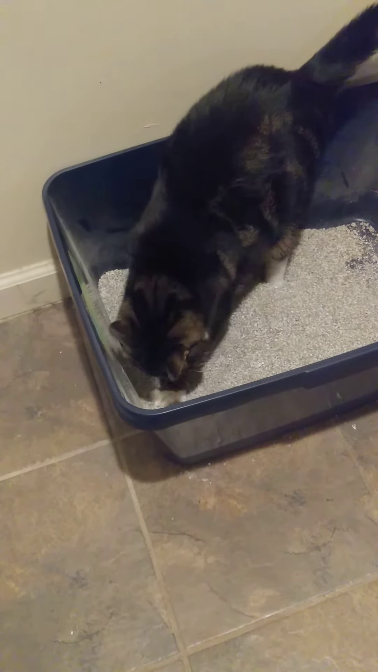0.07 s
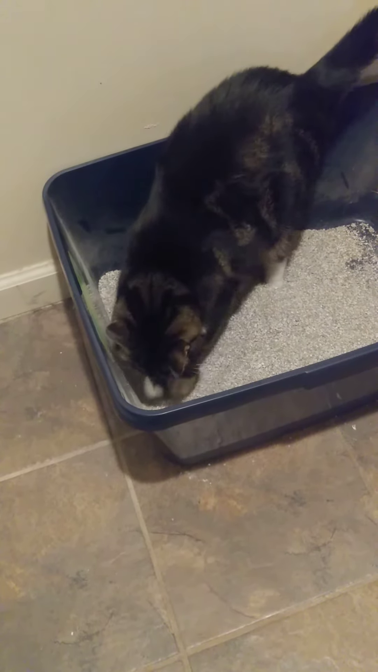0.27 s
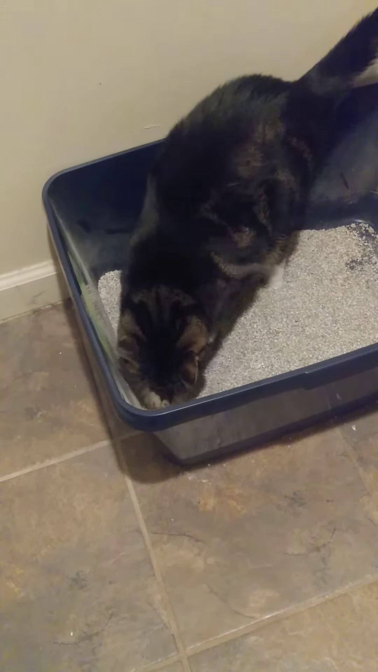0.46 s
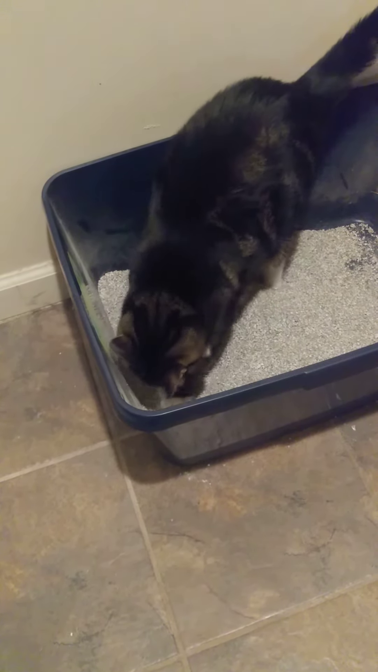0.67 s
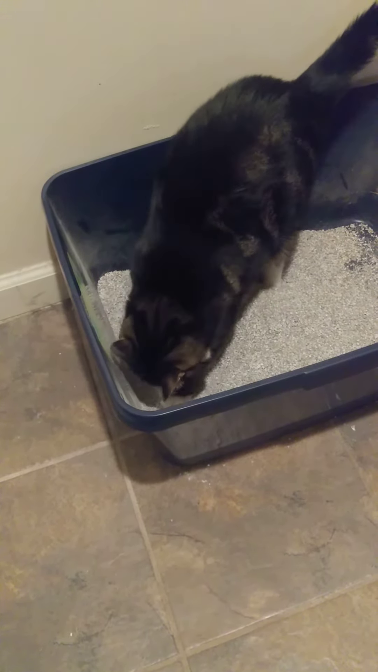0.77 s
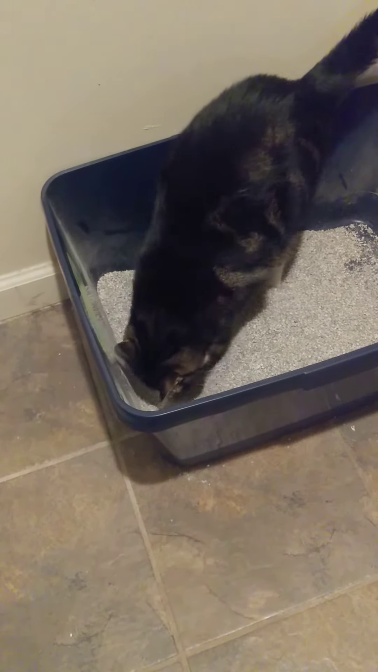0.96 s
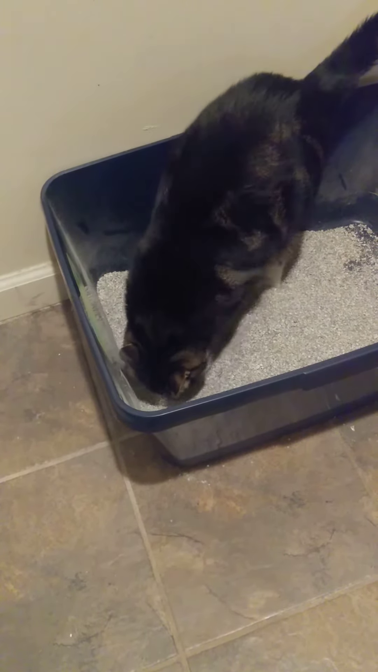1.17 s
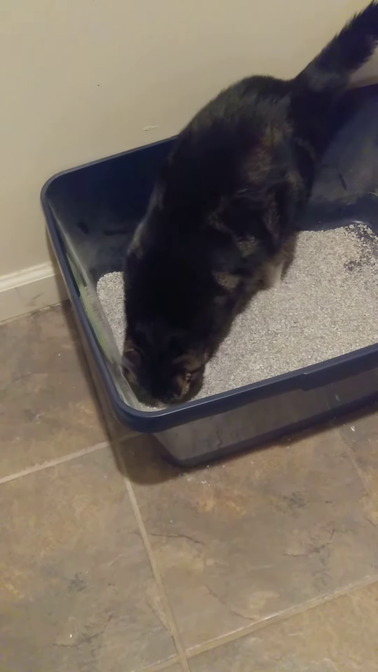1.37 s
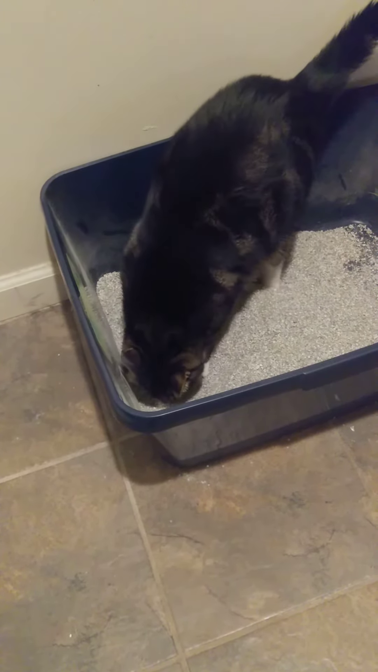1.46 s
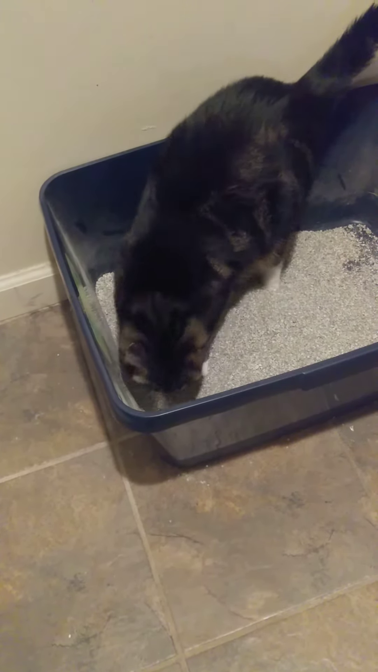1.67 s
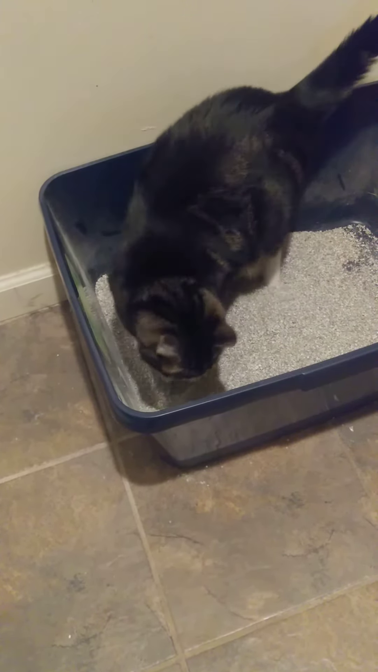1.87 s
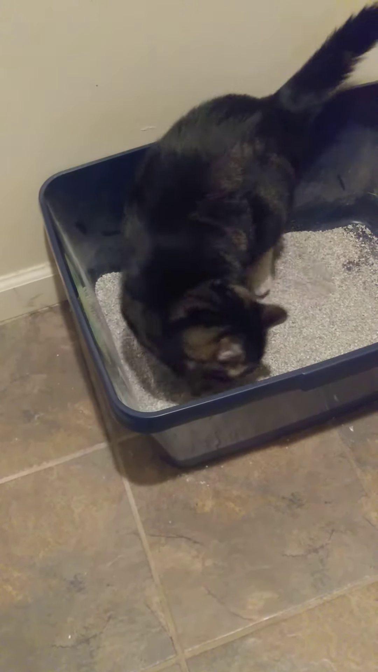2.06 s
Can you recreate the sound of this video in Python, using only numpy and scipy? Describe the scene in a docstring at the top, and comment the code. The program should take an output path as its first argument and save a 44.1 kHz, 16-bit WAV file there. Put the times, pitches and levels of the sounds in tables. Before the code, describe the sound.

Cat paw scraping granular litter in a plastic tub, short raspy scratches over faint fan hum

```python
"""A cat rakes granular litter in a plastic box in a small tiled room, picked up in mono.
Each paw stroke is a dense run of grain slips: filtered noise clicks rumble and rasp through the
resonances of the tub, while a third run of slips goes straight into the air as a hiss of pushed grit.
Soft thuds of the paw, claw taps and single granules ticking on the plastic join in; the hard walls
answer with a noise tail. Behind it a fan hums faintly: wavering tones over a soft rush of air."""
import sys
import numpy as np
from scipy import signal
from scipy.fft import rfft, irfft
from scipy.io import wavfile

SR = 44100
rng = np.random.default_rng(int(sys.argv[2]) if len(sys.argv) > 2 else 0)


def unload_wav(signal):
    """Save mono or channel-first audio to the path in sys.argv[1] as 16-bit WAV at rate SR, clipped to [-1, 1]."""
    wavfile.write(
        sys.argv[1],
        SR,
        np.round(np.clip(np.atleast_2d(signal).T, -1, 1) * 32767).astype(np.int16),
    )


N = 92610   # length in samples
T = np.arange(N) / SR   # time in s

# Paw strokes: start [t/s], rise [t/s], hold [t/s], lag of the grit [t/s], rise of the grit [t/s],
# rumble before the tub [level/dB], rasp before the tub [level/dB], grit hiss [level/dB]
STROKES = [(0.019, 0.046, 0.18, 0.014, 0.026, -52.5, -54.5, -56.5),
           (0.145, .09, 0.018, -.004, 0.1, -34.5, -32.5, -36.5),
           (0.275, .065, 0.0091, -0.02, 0.13, -39.5, -25, -27),
           (0.36, 0.018, 0.0048, -0.021, 0.018, -68, -54, -50),
           (0.512, 0.032, 0.028, -0.0028, 0.029, -42, -46, -46.5),
           (0.6, 0.065, 0.046, -0.0017, 0.084, -39, -31.5, -33.5),
           (0.776, 0.047, 0.016, 0.012, 0.04, -31.5, -32.5, -28.5),
           (0.821, 0.034, 0.027, 0.012, 0.042, -34, -25, -26),
           (1.083, 0.056, 0.014, 0.0089, 0.038, -36, -30.5, -32.5),
           (1.147, 0.037, 0.031, -0.012, 0.041, -66, -44.5, -32),
           (1.217, .01, 0.011, -0.0024, 0.0089, -55, -42, -32.5),
           (1.277, 0.023, 0.052, 0.0017, .025, -69, -56.5, -51),
           (1.791, 0.035, .018, 0.0068, .012, -44.5, -34, -38.5),
           (1.858, 0.027, 0.022, -0.0019, 0.023, -56, -51, -52.5)]
# Spectra of the strokes, shape only: [f/Hz], [relative level/dB]
RUMBLE_SPECTRUM = [(60, -23.5), (140, -25), (200, -4), (330, -3), (430, -11), (650, 0.5), (900, -1),
                   (1400, -8), (3000, -21), (16000, -65)]
RASP_SPECTRUM = [(100, -52), (400, -34), (800, -9.5), (1300, 0), (2200, 1), (2700, -5), (4500, -9.5),
                 (7000, -10), (10000, -21.5), (16000, -30)]
GRIT_SPECTRUM = [(200, -62), (1200, -29), (2600, -5), (3800, 1), (5000, 0), (6200, 0), (7900, -5.5),
                 (9200, 5), (9900, -1.5), (10800, -14.5), (13000, -23.5), (16000, -24)]
# Resonances of the plastic tub: centre [f/Hz], width [f/Hz], level before TUB_DB [level/dB]
TUB_MODES = [(522, 33, 5.5), (642, 47, 1), (683, 35, -3.5), (770.6, 7, 4.5), (830, 24, 0.5), (986, 70, -3),
             (1287, 32, 3), (1396, 18, 4.5), (1557, 44, -6), (1793, 10, -2), (1874, 31, -4.5),
             (2065, 33, -6), (2240, 96, -2.5), (2390, 12, -15), (2810, 160, -1), (3170, 19, 6),
             (3492, 77, 8.5)]
# The paw presses down: start [t/s], hold [t/s], force [level/dB]
THUDS = [(0.617, 0.067, -43), (0.805, 0.073, -41)]
# Spectrum of a thud, shape only: [f/Hz], [relative level/dB]
THUD_SPECTRUM = [(50, -27), (110, -18), (180, -7.5), (260, 2), (350, -0.5), (520, 3), (700, 6), (1200, -23),
                 (16000, -70)]
# A claw taps the wall of the box: start [t/s], force [level/dB]
CLAW_TAPS = [(0.0244, -32.5), (0.028, -32), (0.0519, -35)]
# Spectrum of a claw tap, shape only: [f/Hz], [relative level/dB]
CLAW_SPECTRUM = [(300, -21), (1300, -12.5), (1950, 4.5), (2700, -3), (4000, 1), (4500, -3), (5000, 3),
                 (5600, -9), (7300, -7), (8500, -9), (9400, 6), (10200, -6), (11000, -16), (16000, -22)]
# Single granules hit the plastic: time [t/s], click [level/dB], patter of its neighbours [level/dB]
TICKS = [(0.0128, -31.5, -46), (0.0526, -25, -39), (0.361, -16, -28), (0.607, -25, -35),
         (0.631, -4.5, -25.5), (0.674, -17, -31), (1.2311, -6, -23), (1.296, -16, -44), (1.446, -36, -52),
         (1.4913, -31, -51.5), (1.6413, -36, -51), (1.66, -48, -72), (1.70, -37, -68), (1.74, -38, -58),
         (1.759, -37, -56), (1.8335, -26, -50), (1.9625, -26, -58), (2.035, -40, -52)]
# Spectrum of granules on plastic, shape only: [f/Hz], [relative level/dB]
TICK_SPECTRUM = [(300, -20), (1500, -25), (3300, -11), (4700, -4.5), (6000, 3), (7000, 3), (8100, -4),
                 (9300, 7), (10000, 1.5), (11000, -8), (13000, -15), (16000, -11)]
# Decay of the room: band centre [f/Hz], time to fall by 60 dB [t/s]
ROOM_T60 = [(250, 0.41), (800, 0.36), (2000, 0.37), (4500, 0.45), (9000, 0.28), (15000, 0.42)]
# Hum tones of the fan: [f/Hz], rms about which it wavers [level/dB]
HUM = [(59.3, -75), (166, -73), (237, -47.5), (255, -60.5), (287, -57), (356, -59), (830, -67), (1126, -67)]
# Spectrum of the fan's air, shape only: [f/Hz], [relative level/dB]
FAN_AIR_SPECTRUM = [(25, -47), (40, -39), (60, -25), (110, -21), (170, -8), (280, -2), (370, -3.5),
                    (470, -11), (1000, -16.5), (1500, -21), (2500, -21), (4500, -29), (8000, -31.5),
                    (9400, -28), (11000, -45), (16000, -45)]

RELEASE_S, GRIT_RELEASE_S = 0.018, 0.014   # decay as the paw lifts; decay of the grit
SLIPS_PER_S, SLIP_SPREAD_DB = 9000, 2
JUDDER_DB, JUDDER_PER_S = 1.46, 120   # the paw catches and slips
TUB_DB, THROUGH_TUB_DB = -0.5, -2.5   # all resonances; everything heard through the tub
THUD_RISE_S, THUD_DECAY_S = 0.0048, 0.015
CLAW_RISE_S, CLAW_DECAY_S = 0.00043, 0.0033
PATTER_DECAY_S = 0.0039
ROOM_DB, ROOM_DELAY_S = -3.5, 0.004
HUM_WAVER_DB, HUM_WAVER_RAD, HUM_WAVER_HZ = 0.5, 0.066, 2.5
FAN_AIR_DB = -49
BASS_CUT_HZ, CUTOFF_HZ = 42, 16000


def paw():
    """Strokes drive three runs of grain slips: rumble and rasp through the tub, grit into the air."""
    rumble = rasp = grit = 0
    for start, rise, hold, lag, grit_rise, rumble_db, rasp_db, grit_db in STROKES:
        force = push(start, rise, hold, RELEASE_S)
        grit_force = push(start + lag, grit_rise, hold, GRIT_RELEASE_S)
        # overlapping strokes add as power
        rumble = np.hypot(rumble, from_db(rumble_db) * force)
        rasp = np.hypot(rasp, from_db(rasp_db) * force)
        grit = np.hypot(grit, from_db(grit_db) * grit_force)
    rumble = grain_run(rumble, RUMBLE_SPECTRUM)
    rasp = grain_run(rasp, RASP_SPECTRUM)
    grit = grain_run(grit, GRIT_SPECTRUM)
    return from_db(THROUGH_TUB_DB) * tub(rumble + rasp) + grit


def push(start, rise, hold, release):
    """Force of one press: eases in, holds, dies away exponentially."""
    ease_in = np.sin(np.pi / 2 * np.clip((T - start) / rise, 0, 1)) ** 2
    die_away = np.exp(-np.maximum(T - start - rise - hold, 0) / release)
    return ease_in * die_away


def grain_run(level, spectrum):
    """Dense grain slips follow the stroke's level, roughened by the judder of the paw."""
    judder = from_db(JUDDER_DB * drift(JUDDER_PER_S))
    return colour(level * judder * slips(SLIPS_PER_S, SLIP_SPREAD_DB), spectrum)


def slips(rate, spread_db):
    """Random clicks of either sign and uneven size, at a mean rate per second; rms 1."""
    sizes = from_db(spread_db * np.minimum(rng.exponential(1, N), 5))
    signs = rng.choice([-1, 1], N)
    happens = rng.random(N) < rate / SR
    return rms_one(sizes * signs * happens)


def tub(x):
    """The plastic walls add their resonances to whatever shakes them."""
    out = x.copy()
    for hz, width, db in TUB_MODES:
        r = np.exp(-np.pi * width / SR)
        feed = np.array([1, 0, -1]) * (1 - r * r) / 2   # unit gain near the peak
        feedback = [1, -2 * r * np.cos(2 * np.pi * hz / SR), r * r]
        out += from_db(db + TUB_DB) * signal.lfilter(feed, feedback, x)
    return out


def thuds():
    """The paw's weight comes down on the litter: a soft, dull knock of shaped noise."""
    force = sum(from_db(db) * push(start, THUD_RISE_S, hold, THUD_DECAY_S)
                for start, hold, db in THUDS)
    return colour(force * rng.standard_normal(N), THUD_SPECTRUM)


def claws():
    """Each tap is a tiny skid on the plastic: a brief run of slips, with a peak near 2 kHz."""
    force = sum(from_db(db) * push(start, CLAW_RISE_S, 0, CLAW_DECAY_S) for start, db in CLAW_TAPS)
    return colour(force * slips(12000, 1.2), CLAW_SPECTRUM)


def granules():
    """A sharp click for each granule, with a brief dying patter of its neighbours."""
    clicks, patter = np.zeros(N), np.zeros(N)
    for start, click_db, patter_db in TICKS:
        i = int(start * SR)
        clicks[i] += from_db(click_db)
        patter[i:] += from_db(patter_db) * np.exp(-T[:N - i] / PATTER_DECAY_S)
    patter = patter * slips(9000, 2.5)
    return colour(clicks + patter, TICK_SPECTRUM)


def room(x):
    """Hard walls: a dense noise tail that dies at its own rate in each band."""
    t = T[:int(0.75 * SR)]
    white = rfft(rng.standard_normal(len(t)))
    hz = np.arange(len(t) // 2 + 1) * SR / len(t)
    centres, t60s = np.transpose(ROOM_T60)
    tail = np.zeros(len(t))
    for band, t60 in zip(np.eye(len(centres)), t60s):
        weight = np.interp(hz, centres, band)   # crossfades into the neighbouring bands
        tail += irfft(white * weight, len(t)) * from_db(-60 * t / t60)
    tail *= t > ROOM_DELAY_S
    return x + from_db(ROOM_DB) * signal.fftconvolve(x, tail / np.linalg.norm(tail))[:N]


def fan():
    """Tones that waver slightly in level and phase, over a soft rush of air."""
    hum = 0
    for hz, db in HUM:
        level = from_db(db + HUM_WAVER_DB * drift(HUM_WAVER_HZ))
        phase = 2 * np.pi * (hz * T + rng.random()) + HUM_WAVER_RAD * drift(HUM_WAVER_HZ)
        hum = hum + level * np.sqrt(2) * np.sin(phase)
    return hum + from_db(FAN_AIR_DB) * colour(rng.standard_normal(N), FAN_AIR_SPECTRUM)


def from_db(db):
    """Decibels to gain."""
    return 10 ** (np.asarray(db) / 20)


def rms_one(x):
    """Scale to rms 1."""
    return x / np.sqrt(np.mean(x ** 2) + 1e-20)


def drift(rate):
    """Smooth random wander of rms about 1: noise through a two-pole lowpass at rate Hz."""
    step = 40   # samples between computed points
    r = np.exp(-2 * np.pi * rate * step / SR / 1)
    noise = rng.standard_normal(N // step + 2002)
    slow = signal.lfilter([1], [1, -2 * r, r * r], noise)[2000:]   # drop the settling
    return np.interp(np.arange(N) / step, np.arange(len(slow)), rms_one(slow))


def colour(x, points):
    """Minimum-phase filter of unit energy that follows a spectrum."""
    size = 8192
    hz, db = np.transpose(points)
    bins_hz = np.arange(size // 2 + 1) * SR / size
    gain = from_db(np.interp(np.log(bins_hz + 1), np.log(hz), db))
    # folding the cepstrum makes the response causal
    cepstrum = irfft(np.log(gain))
    cepstrum[1:size // 2] *= 2
    cepstrum[size // 2 + 1:] = 0
    response = irfft(np.exp(rfft(cepstrum)))
    return signal.fftconvolve(x, response / np.linalg.norm(response))[:N]


def scene():
    """The litter box in its room, over the fan, which is added without the room's tail."""
    box = paw() + thuds() + claws() + granules()
    return (room(box) + fan())[None]


def record(dry):
    """The microphone loses the deepest bass; the top is cut steeply."""
    bass_cut = signal.butter(4, BASS_CUT_HZ, "high", fs=SR, output="sos")
    top_cut = signal.ellip(12, 0.2, 70, CUTOFF_HZ, fs=SR, output="sos")
    return signal.sosfilt(top_cut, signal.sosfilt(bass_cut, dry))


dry = scene()
out = record(dry)
unload_wav(out)
```